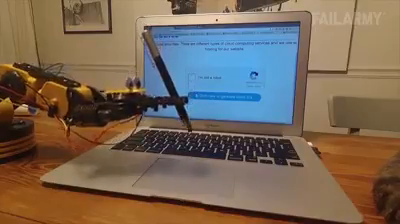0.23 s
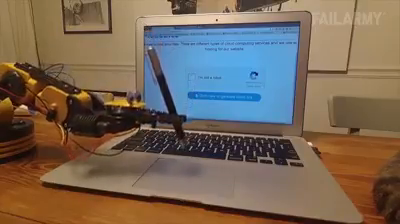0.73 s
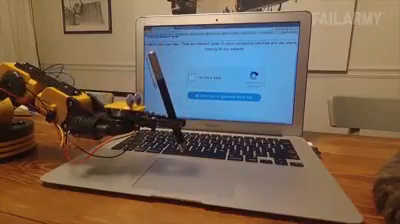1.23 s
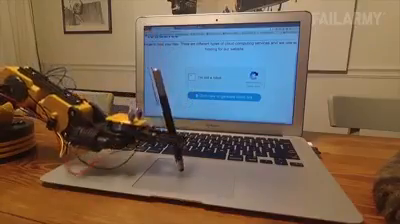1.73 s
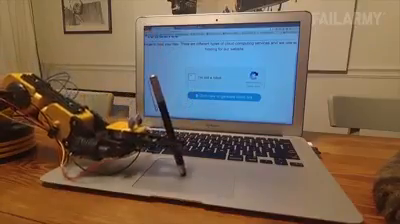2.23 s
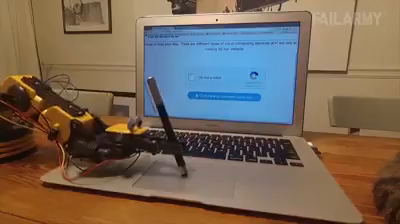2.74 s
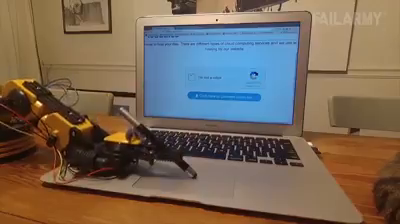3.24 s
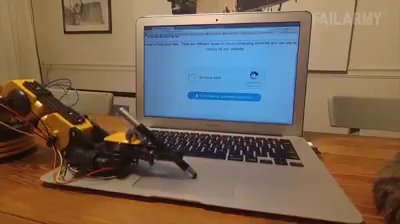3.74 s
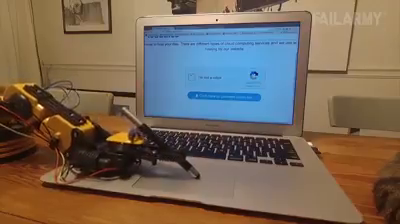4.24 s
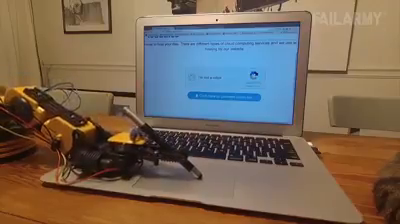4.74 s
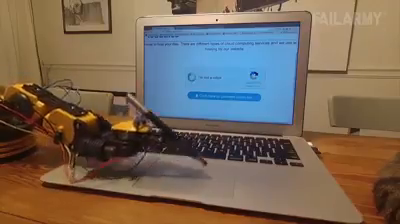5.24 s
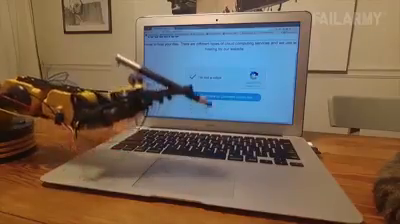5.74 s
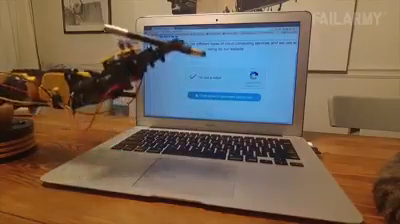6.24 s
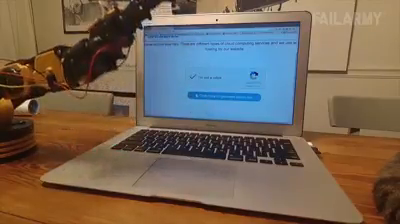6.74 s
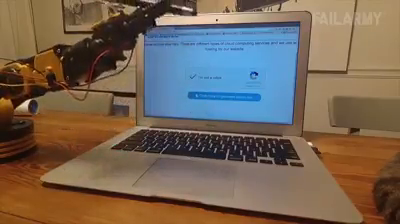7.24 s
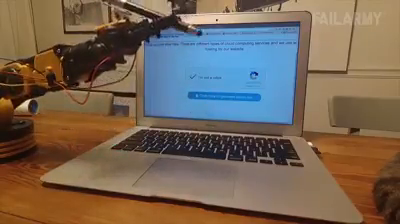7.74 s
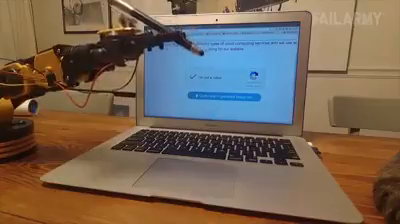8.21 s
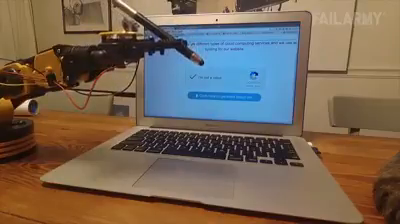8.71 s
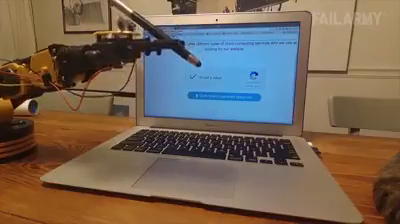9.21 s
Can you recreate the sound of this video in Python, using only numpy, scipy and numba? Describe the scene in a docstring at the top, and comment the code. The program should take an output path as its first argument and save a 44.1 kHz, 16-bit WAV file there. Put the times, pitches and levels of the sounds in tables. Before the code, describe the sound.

A small quiet room, close to a hobby robot arm on a desk, with faint still air. At 0.1 s a gear clack starts a thin raspy motor whir that cuts, coasts down in pitch and restarts briefly, ending near 1.1 s. At 1.5 s a double clack begins a fuller humming whine, rattly at first, smoother from 2.4 s, sagging in pitch until the stylus topples with sharp clustered knocks at 3.24 s. Near silence, then strong clacks at 3.85 s and a buzzing, stuttering run. A tap at 4.8 s joins a labouring, lower, growling lift that swells until 6.9 s. From 6.7 s loose gears rattle much louder and brighter, with crisp irregular ticks until 8.5 s, coasting down and fading by 9.0 s. A clack and a hard short buzz run from 9.1 to 9.5 s, stopping abruptly. A very faint, very high whistle accompanies much of it.

```python
"""Robot arm with a stylus

A hobby robot arm on a wooden desk lowers a stylus onto a laptop, lets it topple, and lifts it away.
Small motors spin up, coast and labour; they hum and whine at multiples of their shaft rate.
Random tooth blows make plastic gears rattle, and short noise bursts make clacks, ticks and knocks.
A faint steady whistle, still air and the echoes of a small, quiet room surround the arm."""
import sys
import numpy as np
from scipy import signal
from scipy.fft import rfft, irfft, next_fast_len
from scipy.io import wavfile
from scipy.ndimage import uniform_filter1d
from numba import njit

SR = 44100
rng = np.random.default_rng(int(sys.argv[2]) if len(sys.argv) > 2 else 0)


def materialize(psi):
    """Save the field psi as 16-bit PCM at rate SR to the path in sys.argv[1].

    A 1-D psi becomes a single channel; in a 2-D psi each row is a channel.
    """
    bounded = np.clip(np.atleast_2d(psi).T, -1, 1)
    quanta = np.round(bounded * 32767).astype(np.int16)
    wavfile.write(sys.argv[1], SR, quanta)


N = 417627
TIME = np.arange(N) / SR  # seconds


def undb(db):
    """Turn decibels into gain."""
    return 10 ** (np.asarray(db) / 20)


def unit(x):
    """Scale to an average (rms) level of 1."""
    return x / np.sqrt(np.mean(x ** 2) + 1e-18)


def curve(rows, t):
    """Draw straight lines through (time, value) rows."""
    return np.interp(t, *np.transpose(rows))


def shape(x, gain):
    """Filter by a gain given as a function of frequency."""
    size = next_fast_len(len(x) + 2048)
    hz = np.maximum(np.fft.rfftfreq(size, 1 / SR), 1)
    return irfft(rfft(x, size) * gain(hz), size)[:len(x)]


def colour(x, points):
    """Filter by (Hz, dB) points, joined by lines over log frequency."""
    hz, db = np.transpose(points)
    return shape(x, lambda f: undb(np.interp(np.log(f), np.log(hz), db)))


def walk(rate, size):
    """Smooth random drift with spread 1: random steps, averaged twice."""
    k = max(int(SR / rate), 1)
    held = np.repeat(rng.standard_normal(size // k + 1), k)
    smooth = uniform_filter1d(uniform_filter1d(held, k), k // 2 + 1)
    return unit(smooth[:size])


@njit
def resonator(x, hz, width):
    """State-variable band-pass that rings at a centre which may move; width in Hz."""
    out, band, low = np.empty(len(x)), 0., 0.
    for i in range(len(x)):
        g = np.tan(np.pi * hz[i] / SR)
        damping = width / hz[i]
        v = (band + g * (x[i] - low)) / (1 + g * (g + damping))
        band = 2 * v - band
        low += 2 * g * v
        out[i] = damping * v
    return out


def ring(x, modes):
    """Add up fixed resonances given as (Hz, width in Hz, dB)."""
    return sum(undb(db) * resonator(x, np.full(len(x), float(hz)), float(width)) for hz, width, db in modes)


@njit
def rotor(power, kick, spin_up_s, coast_s):
    """Share of full speed: it climbs fast under power and sinks slowly without."""
    out, spin = np.empty(len(power)), kick
    for i in range(len(power)):
        spin += (power[i] - spin) / (SR * (spin_up_s if power[i] > 0 else coast_s))
        out[i] = spin
    return out


def motion(t, shaft_hz, spin_up_s):
    """Spin (share of full speed), shaft rate, and load as the drop in powered speed (0 free, 1 full)."""
    # the power is cut and the motor coasts: from_s, to_s
    coasts = [(.26, 0.57), (0.669, 1.2), (1.7, 1.833), (4.19, 4.35), (4.485, 4.73), (8.24, 8.98)]
    kick, coast_s = .5, .52  # share of full speed at switch-on; time constant of the coasting rotor
    free_hz, labour_hz = 213.6, 151.5  # shaft speed with no load and under full load
    power = np.ones(len(t))
    for cut_s, back_s in coasts:
        power[(t > cut_s) & (t < back_s)] = 0
    spin = rotor(power, kick, float(spin_up_s), coast_s)
    powered_hz = curve(shaft_hz, t) if np.ndim(shaft_hz) else shaft_hz
    load = (free_hz - powered_hz) / (free_hz - labour_hz)
    return spin, spin * powered_hz, load


def slips(t):
    """Teeth slip or grip for a moment: smooth humps change rattle, roughness and gear ring (dB)."""
    # moments of slip; a negative level means that the teeth grip:
    # middle_s, length_s, rattle_db, roughness_db, gear_ring_db
    slip_rows = [(1.603, 0.067, 1.5, 1, 10), (1.823, 0.28, 8.5, 3, 7), (2.06, 0.1, 3.5, 7, 4),
                 (2.46, .16, -0.5, -7, -1), (2.753, 0.26, .5, -7.5, -1), (3.101, 0.36, -1.5, -6, 2),
                 (3.905, 0.063, 8, 2, 8), (4.023, 0.19, 4, -6, 11), (4.133, 0.092, 3.5, 3, 15),
                 (4.228, 0.091, 5.5, -4, 15), (4.35, 0.14, 3.5, 1, 14), (4.93, 0.14, 6.5, 3, 15),
                 (5.16, 0.21, -2, 1, -7), (5.39, 0.059, 2.5, -4, 6), (5.63, 0.16, 4, -1.5, 4),
                 (6.023, 0.13, 1, -2, 13), (6.264, 0.16, 1.5, -9, 11), (6.437, 0.24, -3, 4.5, 8),
                 (6.825, 0.073, 4, 16, 13), (7.142, .08, 5, -0.5, 8), (7.31, 0.023, -11, -7, -2),
                 (7.42, 0.044, 7.5, 0, 8), (7.697, 0.069, 7, -6, 6), (7.852, 0.069, 6.5, 4, 10),
                 (7.998, 0.066, 4.5, 3, -2), (8.26, 0.02, 4, 2, 5), (8.458, 0.07, -9.5, 11, 8)]
    at_s, length_s, rattle_db, rough_db, ring_db = np.transpose(slip_rows)
    humps = np.exp(-(2 * (t[:, None] - at_s) / length_s) ** 2)
    return humps @ rattle_db, humps @ rough_db, humps @ ring_db


def steady_tone(turns, mesh, uneven_db=1.9, wander=0.87, wander_rate=8, steady_loss=0.32, count=84, size=8192):
    """What repeats on every shaft turn: multiples (orders) whose strengths shift as the gears roll on."""
    orders = np.arange(count)
    height = np.minimum(orders / 14, 1)  # low orders stay steadiest
    db = uneven_db * rng.standard_normal(count) * height - orders / 45
    for order, lift_db in mesh.items():
        db[order] += lift_db
    gains = undb(db) * (orders > 0)

    def stack(order_gains):
        """One turn with random phases, read out at the shaft angle."""
        phases = np.exp(2j * np.pi * rng.random(count))
        one_turn = irfft(order_gains * phases, size)
        return np.interp(turns % 1, np.arange(size) / size, one_turn)

    shifting = sum(walk(wander_rate, len(turns)) * stack(gains * height) for _ in range(3))
    steady = stack(gains * (1 - steady_loss * height))
    return (steady + wander * shifting) * size / np.sqrt(2 * count)


def tooth_blows(turns, scatter_db, high_tooth_db, count=22):
    """Each tooth strikes a little early or late, with its own force; one high tooth knocks every turn."""
    teeth = np.arange(int(turns[-1] * count))
    strike_turns = (teeth + .3 * rng.standard_normal(len(teeth))) / count
    at = np.interp(strike_turns, turns, np.arange(len(turns)))
    scatter = scatter_db * rng.standard_normal(len(teeth)).clip(-2.3, 2.3)
    force = undb(scatter + high_tooth_db * (teeth % count == 0))
    signed = force * rng.choice([-1, 1], len(teeth))
    return unit(np.bincount(at.astype(int), signed, len(turns)))


def wheel(blows, hz, width_hz, overtone_ratio=1.96, overtone_db=-6.5):
    """A gear wheel rings in two modes that glide together."""
    upper = resonator(blows, overtone_ratio * hz, float(overtone_ratio * width_hz))
    return resonator(blows, hz, float(width_hz)) + undb(overtone_db) * upper


def casing(x, modes_db=-10, decay_s=0.0089):
    """The plastic shell has many narrow upper modes; harmonics flare as they glide across them."""
    age = TIME[:SR // 20]
    noise = rng.standard_normal(len(age)) * np.exp(-age / decay_s)
    modes = shape(noise, lambda f: 1 / (1 + (1300 / f) ** 4))
    return x + undb(modes_db) * signal.fftconvolve(x, modes / np.linalg.norm(modes))[:len(x)]


def move(run, shaft_hz, take_up, housing, mesh, joint, loose, rattle_hz=1900, thin_hz=260, blow_db=6,
         wobble=.0026, flutter_rate=85):
    """One run of a joint: steady tone and tooth blows shake the housing and ring the gear wheel."""
    # resonances of the free-running gearbox: pitch_hz, width_hz, level_db
    loose_modes = [(1995, 130, 7), (3120, 244, 12.5), (4200, 430, 7), (7620, 170, -13), (11200, 400, -20)]
    # the sound glances off desk and screen, which colours every move alike: pitch_hz, gain_db
    glance = [(3900, 0.5), (4300, 2), (4550, -2), (4900, 1.5), (6200, -2), (7900, 0), (8400, -5), (9400, 0),
              (11400, 2.5), (12000, -3), (13200, 2.5)]
    # how hum, whine, rattle and grit respond, one row each: spin_db (dB per doubling), load_db (at full load),
    # per_play (dB per dB of play), swell_share (of 1), slip_share (of 1)
    responses = [(4.5, 2.5, -0.38, 0.052, 0.032), (6.5, 8, 0.4, 0, 0.073), (8, 3, 1.07, 1, 0.72),
                 (8.5, -1, .5, 0, 0.71)]
    coast_slack_db, ring_per_play = 22, 1  # a slowing rotor rattles more; play rings the wheel (dB per dB)
    drift, drift_rate = 0.028, 8.55  # the gear ring wanders as the wheel turns (share, steps per s)
    desk_hz, desk_width_hz, song_hz, song_width_hz = 129.8, 9.8, 1856, 30

    start_s, end_s, attack_s, release_s, swell_db, *levels_db = run
    from_s, to_s, play_db, rough_before_db, rough_after_db, before_hz, after_hz = take_up
    scatter_db, high_tooth_db, flutter_db, wheel_db, wheel_width_hz, boom_db, song_db, spin_up_s = joint
    where = (TIME > start_s) & (TIME < end_s)
    t = TIME[where]
    spin, hz, load = motion(t, shaft_hz, spin_up_s)
    turns = np.cumsum(hz * (1 + wobble * walk(60, len(t)))) / SR

    early = np.interp(t, [from_s, to_s], [1, 0])  # 1 before the play changes, 0 after
    play = play_db * early
    slip_db, slip_rough_db, slip_ring_db = slips(t)
    rough_db = rough_after_db + (rough_before_db - rough_after_db) * early
    slack = undb(rough_db + slip_rough_db + coast_slack_db * (1 - spin))

    # short blows carry little bass, so the low orders stay clean
    blows = tooth_blows(turns, scatter_db, high_tooth_db)
    blows = undb(blow_db) * shape(blows, lambda f: f / (f + rattle_hz) * f / np.hypot(f, thin_hz))
    grip = 1 / np.hypot(1, slack)
    shake = grip * (steady_tone(turns, mesh) + slack * blows)
    wheel_hz = after_hz + (before_hz - after_hz) * early ** 2
    wheel_hz = wheel_hz * (1 + drift * walk(drift_rate, len(t)))
    wheel_gain = undb(wheel_db + ring_per_play * play + slip_ring_db)
    shake += wheel_gain * wheel(blows, wheel_hz, wheel_width_hz)
    shake = shake + ring(shake, loose_modes) if loose else casing(shake)
    body = colour(colour(shake, housing), glance)

    flutter = flutter_db * walk(flutter_rate, len(t))
    swell = swell_db * (t - start_s)
    edges_hz = [80, 750, 2700, 6200, 20000]
    flutter_shares = [1.0, 0.51, 0.54, 1.0]
    out = 0
    # hum, whine, rattle and grit are each levelled, then follow spin, load, play and slips
    for lo, hi, db, response, flutter_share in zip(edges_hz, edges_hz[1:], levels_db, responses, flutter_shares):
        spin_db, load_db, per_play, swell_share, slip_share = response
        part = shape(body, lambda f: 1 / (1 + (lo / f) ** 10) / (1 + (f / hi) ** 20))
        part /= np.sqrt(uniform_filter1d(part ** 2, size=4000) + 1e-18)
        part_db = db + spin_db * np.log2(spin) + load_db * load + per_play * play
        part_db = part_db + swell_share * swell + slip_share * slip_db + flutter_share * flutter
        out = out + part * undb(part_db)

    # the desk booms when the shaft slows through its resonance
    boom = ring(out, [(desk_hz, desk_width_hz, boom_db)])
    # with the teeth gripping, the casing sings when an order crosses its own pitch
    song = ring(grip * out, [(song_hz, song_width_hz, song_db)])
    fade = np.minimum((t - start_s) / attack_s, (end_s - t) / release_s)
    return where, (out + boom + song) * np.minimum(fade, 1)


def motors(motor_db=-0.62):
    """Six moves of the joints, some overlapping; in the fifth the gears spin free."""
    # the moves, with relative levels: start_s, end_s, attack_s, release_s, swell_db (per s),
    # hum_db, whine_db, rattle_db, grit_db
    runs = [(.095, 1.093, 0.056, 0.15, 0.5, -61.5, -53.5, -45.5, -47),
            (1.537, 3.253, 0.047, 0.012, 1, -55.5, -57, -55.5, -52),
            (3.856, 4.82, 0.0031, 0.063, -2, -64, -57.5, -47, -49),
            (4.719, 6.873, 0.12, 0.06, 2.44, -58.5, -54.5, -45.5, -48),
            (6.64, 9.017, 0.14, 0.54, -1, -64.5, -46.5, -33, -31),
            (9.107, 9.486, .06, 0.0026, -4, -57.5, -41, -28, -34)]
    # the arm's weight slows the motor in the two long moves: time_s, shaft_hz
    lowering = [(1.98, 187.7), (2.091, 195.3), (2.329, 199.8), (2.486, 206.6), (2.742, 200.5),
                (3.221, 160.2)]
    # the same for the lift: time_s, shaft_hz
    lifting = [(4.9, 194.5), (4.924, 193.7), (5.282, 163.6), (5.782, 159.3), (5.898, 160.5), (6.039, 171.2),
               (6.255, 170.6), (6.37, 169.6), (6.406, 152.1), (6.443, 147.8), (6.562, 156.5),
               (6.759, 162.7)]
    shaft_hz = [196.4, lowering, 190, lifting, 204.1, 177]  # speed under power in each move
    # the play changes once a move: a load takes it up, or the teeth fall loose as the motor stops:
    # from_s, to_s, play_db (before against after), rough_before_db, rough_after_db (blows against tone),
    # ring_before_hz, ring_after_hz
    take_ups = [(.1, .9, -2, 1, 3, 4970, 4100), (1.954, 2.453, 10, 16.5, 3, 3820, 3100),
                (3.86, 4.422, 3.5, 9, 2.5, 3760, 3170), (4.91, 5.146, -1.5, 3.5, -2, 3100, 3780),
                (8.23, 8.362, -4.5, 17.5, 11, 4200, 4050), (9.226, 9.346, -1.5, 6, -2.5, 3700, 3650)]
    # the housing as each joint shakes it, one list per move: pitch_hz, gain_db
    housings = [
        [(76, -36), (130, 0), (214, -12), (346, -26), (560, -4), (712, -8), (1080, -0.5), (1620, -6),
         (2600, -4.5), (3300, 9.5), (5200, -8), (9030, -30.5), (15500, -33)],
        [(76, -36), (130, 8.5), (170, -2.5), (205, 2.5), (350, -12.5), (510, 0), (607, 1.5), (787, -4),
         (1020, -3.5), (1860, -0.5), (2600, -4), (3900, -4.5), (4670, -11.5), (15500, -20.5)],
        [(76, -33), (130, 12), (284, -11), (560, 1), (684, -11), (1250, -12), (1600, -17.5), (2600, -15),
         (3150, -4.5), (4000, -7.5), (6960, -15.5), (9210, -23), (15500, -23)],
        [(76, -28), (130, -17), (169, 0), (267, -34), (326, -1), (415, -32), (497, 1.5), (700, -6.5),
         (1100, -6.5), (1850, -7), (2450, -9.5), (3750, -7), (4670, -15), (5550, -15), (6600, -15),
         (15500, -24.5)],
        [(53, -66), (90, -12.5), (389, -16), (612, -10.5), (712, -23.5), (2050, -24), (2330, -23.5),
         (3660, -4.5), (4160, -7.5), (6010, -8), (8150, -3.5), (8500, -11.5), (9900, -8), (11600, -13.5),
         (12050, -22.5), (13500, -17), (15500, -22)],
        [(76, -58), (130, -28), (380, -26), (507, -10.5), (771, -18), (1220, -9.5), (1700, -15), (2150, -7),
         (2600, -16), (3100, -11), (3980, -11.5), (4700, -15.5), (8510, -23), (9780, -21.5), (15500, -27.5)],
    ]
    # shaft orders that stand out in each move (1 unbalance, 3 commutator, gear meshes above): order, lift_db
    meshes = [{3: 7, 4: 4, 6: 6, 7: 3}, {1: 5, 3: 17, 6: 3, 7: 2, 9: 5, 10: -3, 11: -6, 12: -3, 13: -4, 19:
              4, 21: 4, 27: 9, 45: 9, 57: 9}, {3: 3, 5: 4, 6: 3, 7: 3}, {3: 3, 4: 2, 6: 3, 7: -1, 11: 3, 12:
              1, 14: -4, 22: 2, 23: 2}, {1: 7, 3: 15, 6: -6}, {3: 1, 7: 3, 11: 4, 12: 7, 13: 7, 14: -10, 17:
              1, 20: 2, 22: 4}]
    # character of each move: scatter_db (tooth blows), high_tooth_db, flutter_db, gear_ring_db,
    # gear_ring_width_hz, desk_boom_db, casing_song_db, spin_up_s
    joints = [(3, 5.5, 1.8, -1, 2500, 12.5, 9, .06), (3.3, 4, 1.36, -5.5, 630, 6.5, 11.5, .06),
              (3.5, 4, 1.36, -3.5, 340, 7, -4, .06), (5, 3, 1, -4, 370, 6, 9, .045),
              (5, 5, 2.5, -3.5, 340, 9.5, -3, .05), (3, 12.5, 0.9, -4, 550, 8, -14, .045)]
    out = np.zeros(N)
    for k, parts in enumerate(zip(runs, shaft_hz, take_ups, housings, meshes, joints)):
        where, sound = move(*parts, loose=k == 4)
        out[where] += sound
    return out * undb(motor_db)


def burst(s, db, decay_s):
    """A brief scrape of contact: noise that dies away."""
    out, start = np.zeros(N), int(s * SR)
    age = TIME[:SR // 4]
    out[start:start + len(age)] = undb(db) * np.exp(-age / decay_s) * rng.standard_normal(len(age))
    return out


def clacks(clack_db=8):
    """Gears take up slack and teeth snap together; the jolt rings the gear train and the arm."""
    # the clacks: start_s, level_db (relative), contact_s (decay), arm_ring_db (relative)
    clack_rows = [(.095, -45, .004, -72), (1.533, -50, .008, -72), (1.555, -38, .016, -70),
                  (3.64, -57, .004, -70), (3.753, -54, .004, -64), (3.838, -39.5, .012, -37),
                  (3.861, -29, .015, -62), (8.885, -39, .005, -68), (8.916, -42, .005, -70),
                  (9.098, -43, .005, -51), (9.124, -35, .012, -58)]
    # a struck gear train rings: pitch_hz, width_hz, level_db
    gear_modes = [(2800, 300, -6), (3400, 600, -6), (4150, 150, 5), (6600, 700, -12), (8000, 260, 0),
                  (11000, 3000, -20)]
    # a jolt rings the arm: pitch_hz, t60_s (time to fall 60 dB), level_db
    arm_modes = [(790, .09, -7), (836, .5, -8), (900, .06, -4), (1040, .04, -8)]
    snaps = sum(burst(s, db, contact_s) for s, db, contact_s, _ in clack_rows)
    out = undb(clack_db) * ring(snaps, gear_modes)
    age = TIME[:SR // 3]
    arm = 0
    for hz, t60_s, db in arm_modes:
        arm = arm + undb(db) * np.sin(2 * np.pi * hz * age) * np.exp(-np.log(1000) * age / t60_s)
    arm = shape(arm, lambda f: 1 / (1 + (500 / f) ** 4))
    for s, _, _, ring_db in clack_rows:
        start = int(s * SR)
        out[start:start + len(age)] += undb(ring_db) * arm
    return out


def whistle(pitch_hz=14812, fade_s=.04):
    """The drive electronics sing faintly at the top of hearing: one sine, faded on and off."""
    # when the whistle sounds: from_s, to_s, level_db
    spans = [(1.55, 3.3, -67), (3.86, 8.6, -59)]
    level = 0
    for on_s, off_s, db in spans:
        level = level + undb(db) * np.clip(np.minimum(TIME - on_s, off_s - TIME) / fade_s, 0, 1)
    return level * np.sin(2 * np.pi * pitch_hz * TIME)


def stylus(stylus_db=5, shiver_db=-17):
    """The stylus slips and topples against the laptop, whose case shivers after each blow."""
    # the stylus lands, and taps again as the arm turns back: start_s, level_db (relative), contact_s (decay)
    knocks = [(3.048, -43, .005), (3.2365, -34, .004), (3.2392, -30, .004), (3.2476, -23.5, .002),
              (4.779, -37, .005)]
    # colour of the laptop's case: pitch_hz, gain_db
    laptop = [(50, -18), (120, -11), (200, -1), (278, -5.5), (1950, 7), (5490, -3.5), (6470, -7),
              (8200, -12), (14200, -14), (15500, -20)]
    blows = sum(burst(s, db, contact_s) + burst(s, db + shiver_db, .045) for s, db, contact_s in knocks)
    return undb(stylus_db) * colour(blows, laptop)


def ticks(tick_db=-1.5, contact_s=.0012, tail_db=-15, tail_s=.008):
    """Single teeth of the loose gearbox snap together, short and bright."""
    # the snaps: start_s, level_db (relative)
    tick_rows = [(6.796, -21), (6.997, -24), (7.053, -22), (7.101, -23), (7.272, -17), (7.359, -23),
                 (7.423, -21), (7.709, -21), (7.859, -21), (7.943, -21), (8.069, -22), (8.325, -21),
                 (8.482, -18), (8.52, -27)]
    # their bright colour: pitch_hz, gain_db
    tick_colour = [(1000, -35), (2700, -14), (4100, 2), (5000, -5), (8000, 3), (11500, -1), (12300, -9),
                   (15500, -6)]
    snaps = sum(burst(s, db, contact_s) + burst(s, db + tail_db, tail_s) for s, db in tick_rows)
    return undb(tick_db) * colour(snaps, tick_colour)


def reflections(t60_s, early_db):
    """Dense echoes from desk and screen, then the walls: fading noise of unit energy."""
    age = TIME[:SR // 2]
    fade = np.exp(-np.log(1000) * age / t60_s) + undb(early_db) * np.exp(-age / 0.015)
    echo = rng.standard_normal(len(age)) * fade * (age > .0005)
    return echo / np.linalg.norm(echo)


def scene(room_db=0, side_db=0, room_t60_s=.5, air_db=-67.5):
    """The arm close by, its room, and still air as soft noise; the treble scatters most."""
    # colour of the still air: pitch_hz, gain_db
    air = [(29, -45), (50, -10.5), (227, -5.5), (358, -7), (15500, -20.5)]
    # colour of the echoes and of the stereo difference: pitch_hz, gain_db
    width = [(150, -21), (700, -15), (1400, -11.5), (2800, -11.5), (5600, -6), (10000, -4)]
    dry = motors() + clacks() + stylus() + ticks()
    room = signal.fftconvolve(dry, reflections(room_t60_s, early_db=4))[:N]
    mid = dry + undb(room_db) * colour(room, width)
    side = undb(side_db) * signal.fftconvolve(dry, reflections(room_t60_s, early_db=-5))[:N]
    air_mid, air_side = (undb(air_db) * unit(colour(rng.standard_normal(N), air)) for _ in range(2))
    left_right = np.array([[1], [-1]])  # the side signal has opposite signs in the two channels
    return mid + air_mid + whistle() + colour(side + air_side, width) * left_right


def record(dry, top_hz=15600):
    """A steep low-pass cuts the top of the treble."""
    return signal.sosfilt(signal.ellip(10, .2, 80, top_hz, fs=SR, output="sos"), dry)


dry = scene()
out = record(dry)
materialize(out)
```